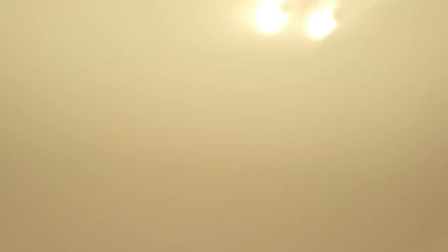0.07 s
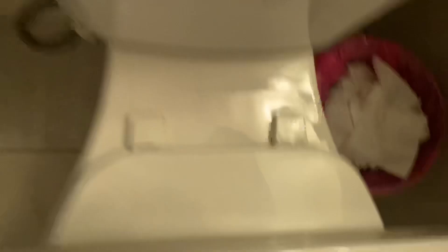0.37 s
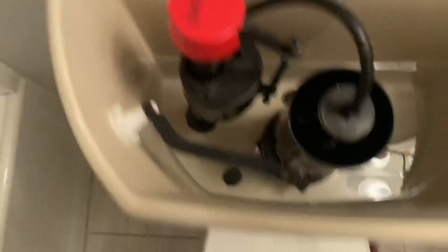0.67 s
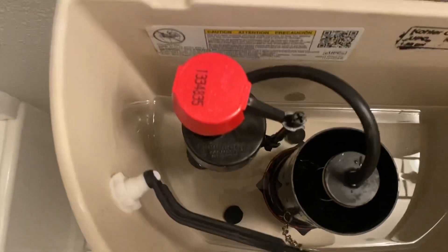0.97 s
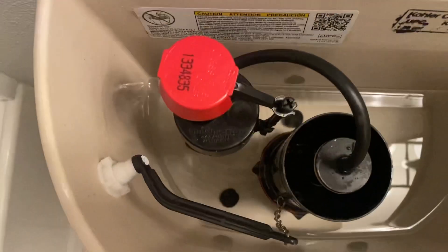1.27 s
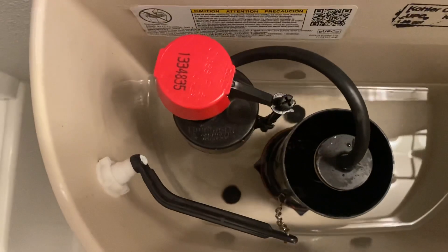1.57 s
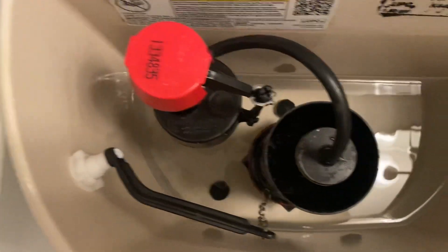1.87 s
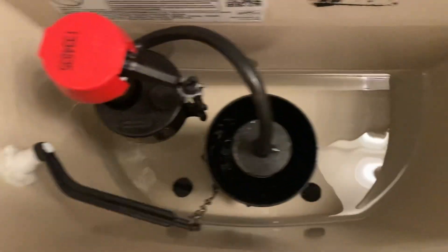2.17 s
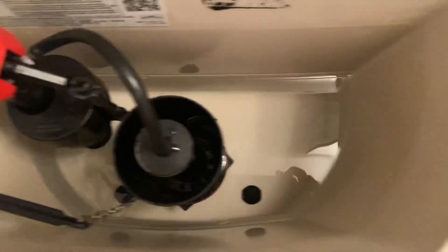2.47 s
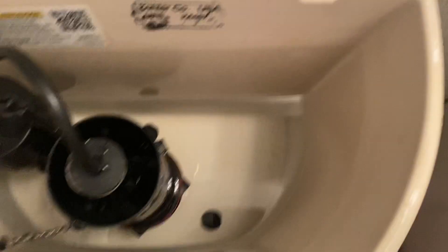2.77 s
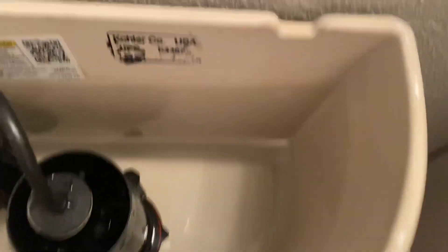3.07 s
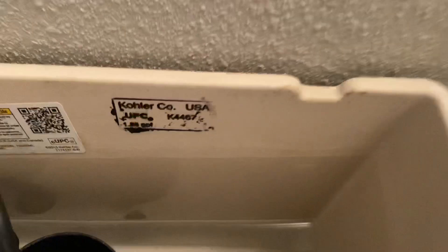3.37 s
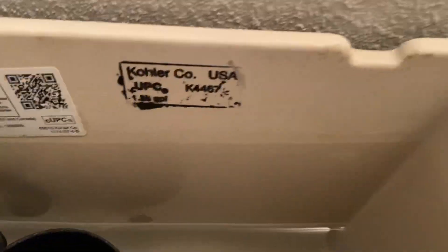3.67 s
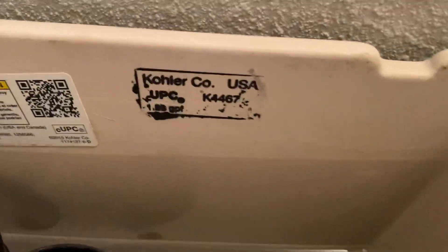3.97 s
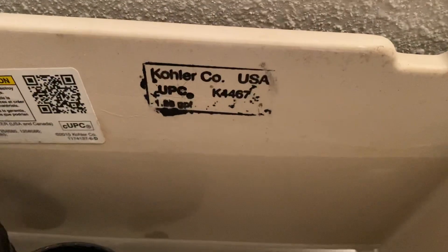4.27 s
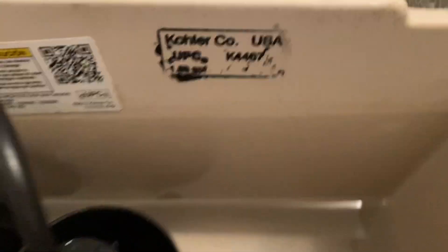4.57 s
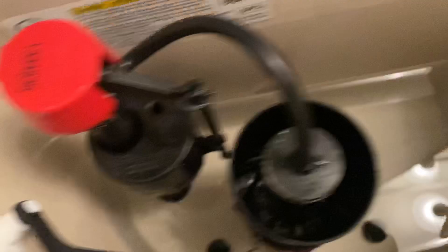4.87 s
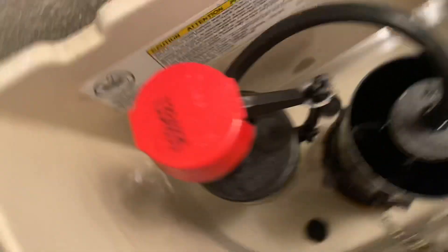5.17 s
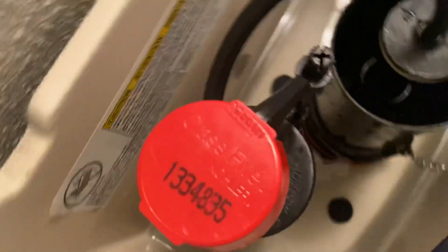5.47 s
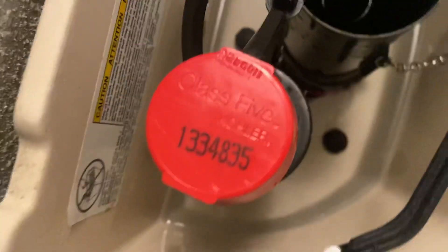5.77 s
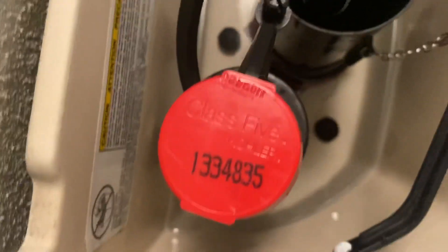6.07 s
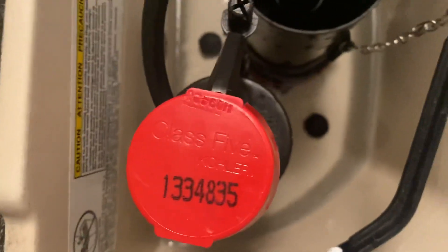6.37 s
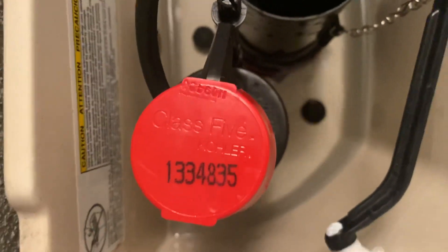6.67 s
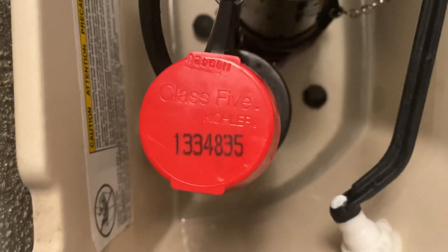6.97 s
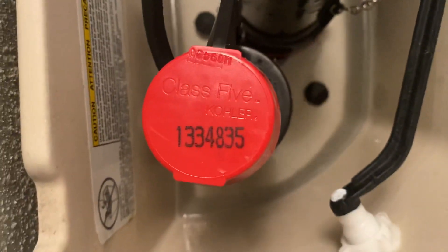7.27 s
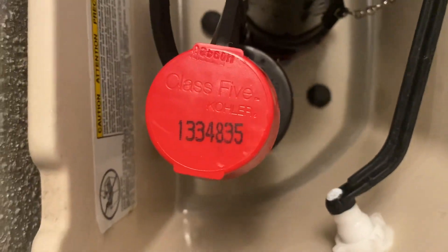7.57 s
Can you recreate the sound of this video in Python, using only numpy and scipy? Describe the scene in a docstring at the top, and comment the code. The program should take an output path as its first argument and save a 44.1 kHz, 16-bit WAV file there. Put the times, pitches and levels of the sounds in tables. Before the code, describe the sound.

Water hisses and rushes steadily through a valve as an open toilet tank refills, with low churning and tiny spits.

```python
"""Open toilet tank refilling

A hand-held camera moves over the tank, is handled twice and leans in towards the fill valve.
The churning inflow booms in the tank's low resonances and the stirred surface rushes.
The valve sings in narrow bands of noise; its jet hisses and spits as tiny bubbles burst.
The camera spreads the treble across the stereo field."""
import sys
import numpy as np
from scipy import signal
from scipy.fft import rfft, irfft, next_fast_len
from scipy.io import wavfile
from scipy.ndimage import uniform_filter1d, map_coordinates

SR = 44100
rng = np.random.default_rng(int(sys.argv[2]) if len(sys.argv) > 2 else 0)


def digitize_waveform(pressure):
    """Quantize a signal to 16-bit integers and store it at the path in sys.argv[1].

    Rows of a 2-D input are taken as channels; values are limited to [-1, 1].
    """
    field = np.atleast_2d(pressure).T
    bounded = np.clip(field, -1, 1)
    quanta = np.round(bounded * 32767).astype(np.int16)
    wavfile.write(sys.argv[1], SR, quanta)


N = 340011
BAND_LIMIT_HZ = 15850


def amp(db):
    """Decibels to gain."""
    return 10 ** (np.asarray(db) / 20)


def unit(x):
    """x at rms 1."""
    return x / np.sqrt(np.mean(x ** 2) + 1e-20)


def along(points, hz):
    """(freq_hz, value) points read on a log axis."""
    freq_hz, values = np.transpose(points)
    return np.interp(np.log(hz + 1), np.log(freq_hz + 1), values)


def spectrum(points):
    """Gain against frequency from (freq_hz, gain_db) points."""
    return lambda hz: amp(along(points, hz))


def resonances(modes, skirt):
    """Gain against frequency of a group of modes; a larger skirt deepens the valleys."""
    return lambda hz: np.sqrt(sum(amp(db) ** 2 / (1 + (2 * (hz - centre) / width) ** 2 / skirt) ** skirt
                                  for centre, width, db in modes))


def curves(rows):
    """One value per sample for each column after the time."""
    time_s, *columns = np.transpose(rows)
    return [np.interp(np.arange(N) / SR, time_s, column) for column in columns]


def wobble(knots_per_s):
    """Smooth random curve."""
    knots = rng.standard_normal(int(N * knots_per_s / SR) + 4)
    return map_coordinates(knots, [np.arange(N) * knots_per_s / SR])


def swells(events):
    """Gain that rises and falls smoothly once per event."""
    t = np.arange(N) / SR
    return sum(amp(db) * np.exp(-(2 * (t - peak_s) / length_s) ** 2) for peak_s, length_s, db in events)


def filtered(x, response):
    """x through a frequency response."""
    size = next_fast_len(N + SR // 2)
    return irfft(rfft(x, size) * response(np.fft.rfftfreq(size, 1 / SR)), size)[..., :N]


def steadied(x, span_s):
    """x with swells slower than span_s evened out."""
    power = uniform_filter1d(np.mean(x ** 2, axis=0), max(int(span_s * SR), 1))
    return x / np.sqrt(np.abs(power) + 1e-6)


def placed(x, lead_rad, pan_db):
    """Stereo x with a moving phase lead and level difference, left over right."""
    left, right = signal.hilbert(x, next_fast_len(N))[:, :N]
    turn = np.exp(0.5j * lead_rad) * amp(pan_db / 2)
    return np.real([left * turn, right / turn])


# Likeness of the two microphones: freq_hz, coherence (capped at 1)
MIC_COHERENCE = [(30, 1.2), (120, 1), (300, 1), (600, 0.6), (1000, 0.5), (1400, 0.65), (1900, 0.7),
                 (2400, 0.66), (4000, 0.8), (5500, 0.5), (6500, 0.5)]
# Their balance: freq_hz, left_over_right_db
MIC_BALANCE = [(120, 0), (350, 2.5), (600, 5.5), (1000, 1.5), (1500, 0), (2400, -1), (2900, 8.5), (3900, 2),
               (5400, 6), (6500, 0)]
# Their phase: freq_hz, left_lead_rad
MIC_PHASE = [(120, 0.028), (350, 0.44), (520, 1), (860, 0.045)]

def turbulence(colour):
    """Coloured noise of rms 1 as the two microphones hear it."""
    size = next_fast_len(N + 8192)
    hz = np.fft.rfftfreq(size, 1 / SR)
    angle = np.arccos(np.clip(along(MIC_COHERENCE, hz), -1, 1)) / 2
    noise = rfft(rng.standard_normal((2, size))) * colour(hz)
    mid, side = noise * np.array([np.cos(angle), np.sin(angle)])
    tilt = amp(along(MIC_BALANCE, hz) / 2) * np.exp(0.5j * along(MIC_PHASE, hz))
    return unit(irfft(np.array([(mid + side) * tilt, (mid - side) / tilt]), size)[:, :N])


def ringing(modes, skirt):
    """Resonances driven by turbulence, at rms 1."""
    return turbulence(resonances(modes, skirt))


def echoes(x, t60_s, wet_db, steps=8):
    """x plus quick reflections whose pattern shifts as the camera moves."""
    t = np.arange(SR // 12) / SR
    hop = N // steps + 1
    wet = np.zeros(N + len(t))
    for centre in range(0, N + hop, hop):
        span = np.arange(max(centre - hop, 0), min(centre + hop, N))
        crossfade = np.sqrt(1 - np.abs(span - centre) / hop)
        tail = rng.standard_normal(len(t)) * amp(-60 * t / t60_s)
        part = signal.oaconvolve(x[span] * crossfade, tail / np.linalg.norm(tail))
        wet[span[0]:span[0] + len(part)] += part
    return x + amp(wet_db) * wet[:N]


def notes(events, rise_per_s):
    """Each event swells as one short note, its pitch rising a little."""
    t = np.arange(N) / SR
    sound = np.zeros(N)
    for (peak_s, length_s, db, hz), phase in zip(events, rng.random(len(events))):
        span = np.abs(t - peak_s) < 2 * length_s
        age = t[span] - peak_s
        envelope = amp(db) * np.exp(-(2 * age / length_s) ** 2)
        sound[span] += envelope * np.sin(2 * np.pi * (phase + hz * age * (1 + rise_per_s * age / 2)))
    return np.sqrt(2) * sound


def bubbles(per_s, pitch_hz, spread, decay_cycles, spread_db):
    """Small bubbles ring briefly, most of them faintly; rms 1."""
    when, pitch, rarity = rng.random((int(per_s * N / SR), 3)).T[:, :, None]
    hz = np.minimum(pitch_hz * np.exp(spread * (2 * pitch - 1)), BAND_LIMIT_HZ)
    size = amp(-spread_db * np.log(np.maximum(rarity, 0.02)))
    age = np.arange(SR // 80)
    cycles = hz * age / SR
    rings = size * np.sin(2 * np.pi * cycles) * np.exp(-cycles / decay_cycles) * (1 - np.exp(-cycles))
    samples = (when * N).astype(int) + age
    return unit(np.bincount(samples.ravel(), rings.ravel(), N)[:N])


def crackle(per_s, spread_db, cap_db, t60_s, rows=1):
    """Envelopes of random pops that add in power: most tiny, a few standing out."""
    hits = rng.random((rows, N)) < per_s / SR
    sizes = hits * amp(np.minimum(spread_db * rng.exponential(size=(rows, N)), cap_db))
    t = np.arange(SR // 20) / SR
    power = signal.oaconvolve(sizes ** 2, amp(-120 * t / t60_s)[None], axes=1)[:, :N]
    return np.sqrt(np.abs(power))


# Camera's lean over the valve: time_s, near_share
CAMERA_LEAN = [(0, 0.15), (0.8, 0.04), (1.6, 0.22), (2.7, 0.23), (3.2, 0.22), (3.9, 0.63), (4.9, 0.64),
               (5.6, 0.88), (7.7, 1)]

def nearness():
    """0 from afar, 1 right over the valve."""
    return np.clip(curves(CAMERA_LEAN)[0], 0, 1)


# Water shaded by the tank's rim: time_s, hidden_share
RIM_SHADE = [(0.25, 0.95), (0.5, 0.07)]

def reach_db(far_db, near_gain_db, rim_loss_db):
    """A layer's level grows as the camera leans in and drops behind the rim."""
    hidden = np.clip(curves(RIM_SHADE)[0], 0, 1)
    return far_db + near_gain_db * nearness() - rim_loss_db * hidden


# Supply pipe's note: centre_hz, width_hz, gain_db
PIPE_MODES = [(830, 160, 0)]
# Room rumble: centre_hz, width_hz, gain_db
ROOM_MODES = [(81, 34, 0)]

def pipe_and_room(pipe_db=-62, room_db=-62):
    """The supply pipe hums faintly over the room's steady rumble."""
    return amp(pipe_db) * ringing(PIPE_MODES, skirt=3) + amp(room_db) * ringing(ROOM_MODES, skirt=3.3)


# Grip shifts: peak_s, length_s, level_db
GRIP_SHIFTS = [(0.13, 0.072, -53), (0.27, 0.15, -42), (0.39, 0.084, -43), (0.52, 0.04, -46),
               (5.01, 0.19, -49), (5.35, .07, -44)]

def handling(centre_hz=55, width_hz=70, low_cut_hz=28):
    """The hand shifts on the camera with a soft rumble."""
    body = resonances([(centre_hz, width_hz, 0)], skirt=2.6)
    rumble = turbulence(lambda hz: body(hz) * (1 - np.exp(-(hz / low_cut_hz) ** 4)))
    return swells(GRIP_SHIFTS) * steadied(rumble, span_s=0.08)


# Tank resonances, three groups: centre_hz, width_hz, gain_db
BOOM_MODES = [(132.4, 21, -2), (152.5, 5.2, -13)]
CHURN_MODES = [(55.7, 13, -14), (88, 34, -8.5), (198, 26, -1.5), (222, 13, -4), (250.8, 22, 4.5),
               (289.5, 52, -1.5), (347, 39, -3.5), (365.2, 7.7, 6.5), (412.7, 24.5, 1), (473, 58, -9.5),
               (770, 19, -10.5), (863, 35, -10)]
HOLLOW_MODES = [(542, 28, 1.5), (579, 24.5, 6), (636, 22, -3.5)]
# Their levels at the camera: time_s, boom_db, churn_db, hollow_db
TANK_LEVELS = [(0, -48.5, -52.5, -60.5), (0.35, -46.5, -56, -60.5), (0.8, -53, -49, -64),
               (1.2, -50.5, -52.5, -64), (1.5, -51, -48, -61.5), (2.5, -49, -49.5, -59),
               (3.85, -48, -42.5, -48.5), (4.2, -41, -43, -48.5), (4.55, -47, -41, -46),
               (5.0, -48, -44.5, -56.5), (5.45, -44, -41.5, -46), (7.7, -42.5, -41, -44.5)]
# Big air bubbles: peak_s, length_s, level_db, pitch_hz
TANK_GLUGS = [(3.09, 0.046, -39, 131), (3.467, 0.042, -41, 132), (3.505, 0.044, -36.5, 130),
              (3.74, 0.034, -35.5, 131), (4.387, .04, -47, 575), (4.555, 0.088, -33, 129),
              (4.97, 0.041, -39.5, 131), (5.15, 0.07, -37, 131), (5.324, 0.045, -39.5, 358),
              (5.449, 0.042, -41, 368), (5.68, 0.051, -35.5, 133), (5.84, 0.053, -35, 133),
              (5.859, 0.043, -39, 580), (6.25, 0.056, -40, 128), (6.469, 0.086, -39, 357),
              (6.626, .035, -42, 570), (6.85, 0.08, -37, 131), (6.864, 0.037, -44, 588),
              (7.11, 0.058, -32, 132), (7.139, .035, -41, 580), (7.187, .035, -42, 572),
              (7.241, 0.037, -40, 132), (7.44, 0.028, -37, 131), (7.655, 0.038, -38.5, 356),
              (7.68, 0.067, -36.5, 132)]

def tank(heave_db=3.0):
    """The inflow churns under water and sounds the tank's low resonances in uneven surges."""
    boom_db, churn_db, hollow_db = curves(TANK_LEVELS)
    churn = amp(churn_db) * steadied(ringing(CHURN_MODES, skirt=3), span_s=0.36)
    boom = amp(boom_db + heave_db * wobble(13)) * steadied(ringing(BOOM_MODES, skirt=4), span_s=0.075)
    hollow = amp(hollow_db) * ringing(HOLLOW_MODES, skirt=2.4)
    return churn + boom + hollow + notes(TANK_GLUGS, rise_per_s=0.43)


# Surface rush from afar and close by: freq_hz, gain_db
RUSH_FAR = [(450, -62), (680, -11), (1050, -10), (1400, -2.5), (1800, 2.5), (2000, -1.5), (2850, -7.5),
            (3100, -14), (3400, 2), (3800, -6.5), (4600, -4), (5000, -10), (5800, -5.5), (7000, -30),
            (10000, -86)]
RUSH_NEAR = [(450, -19), (680, -13), (1000, -11.5), (1200, -6), (1720, 1), (1950, -7), (2850, 0),
             (3100, -13), (3400, -9), (3800, -7.5), (4600, -35), (5000, -11.5), (5800, -10.5), (7000, -38),
             (10000, -63)]
# Its level: far_db, near_gain_db, rim_loss_db
RUSH_REACH = (-49, 9.3, 13)

def surface_rush(froth_db=-6.5):
    """The stirred surface rushes, dotted with small bubbles that echo between the tank walls."""
    near = nearness()
    far_noise = np.sqrt(1 - near) * turbulence(spectrum(RUSH_FAR))
    near_noise = np.sqrt(near) * turbulence(spectrum(RUSH_NEAR))
    rush = (far_noise + near_noise) * amp(1.07 * wobble(22))
    froth = bubbles(per_s=170, pitch_hz=4006, spread=0.341, decay_cycles=9.2, spread_db=1.5)
    froth = unit(echoes(froth, t60_s=0.2, wet_db=3.5))
    return amp(reach_db(*RUSH_REACH)) * (rush + amp(froth_db) * froth)


# Bright spray sheen, passing glint, dull undertone: centre_hz, width_hz, gain_db
SHEEN_MODES = [(4184, 110, 9), (4346, 130, 6.5), (4690, 150, 1.5)]
GLINT_MODES = [(2820, 130, 0), (3430, 130, -5), (3700, 130, 3), (5260, 110, 5), (6230, 120, 12)]
UNDERTONE_MODES = [(1010, 170, 0), (1200, 110, -1)]
# Sheen near 4.3 kHz comes and goes, loudest late, close over the valve: time_s, level_db
SHEEN_LEVEL = [(0.3, -87), (0.52, -52.5), (1.3, -51), (1.6, -66), (1.98, -55), (2.4, -62), (3.8, -52),
               (5.3, -48.5), (5.65, -54), (7.7, -48.5)]
# Glint as the camera swings across the valve: peak_s, length_s, level_db
GLINTS = [(5.05, 0.95, -45)]
# Undertone, fading while the camera faces the back wall: time_s, level_db
UNDERTONE_LEVEL = [(0.3, -69), (0.55, -62.5), (1.9, -59), (2.6, -72), (4.2, -71), (4.9, -54.5), (7.7, -59)]

def passing_resonances():
    """Bright and dull resonances come and go as the camera moves."""
    sheen = amp(curves(SHEEN_LEVEL)[0] + 1.95 * wobble(25)) * ringing(SHEEN_MODES, skirt=2.3)
    glint = swells(GLINTS) * ringing(GLINT_MODES, skirt=2.5)
    undertone = amp(curves(UNDERTONE_LEVEL)[0]) * ringing(UNDERTONE_MODES, skirt=2.5)
    return sheen + glint + undertone


def gliding_band(centre_hz, width_hz, waver_hz=4, flutter_db=0.8):
    """A narrow band of noise flutters and follows a moving, wavering centre."""
    mean_hz = centre_hz.mean()
    band = steadied(ringing([(mean_hz, width_hz, 0)], skirt=1.6), span_s=0.41)
    band *= amp(flutter_db * wobble(18))
    shift_cycles = np.cumsum(centre_hz - mean_hz + waver_hz * wobble(9)) / SR
    return np.real(signal.hilbert(band, next_fast_len(N))[:, :N] * np.exp(2j * np.pi * shift_cycles))


# Valve bands through the tank's standing waves, before trim: time_s, low_db, middle_db, high_db, top_db
BAND_LEVELS = [(0, -48.5, -56, -50, -49.5), (0.28, -54, -55, -65, -55.5), (0.52, -46.5, -47, -44, -39.5),
               (0.85, -46, -48, -43.5, -45), (1.2, -51.5, -49.5, -47, -44.5), (1.7, -47.5, -46.5, -41, -44),
               (2.3, -46.5, -50.5, -41, -38), (2.9, -50.5, -55, -40.5, -42.5), (3.45, -44, -53, -39, -41.5),
               (3.85, -36.5, -50, -35, -41), (4.5, -37.5, -53, -33.5, -37.5), (4.8, -43, -40, -35, -31),
               (5.2, -46, -43.5, -42, -36), (5.55, -45, -43, -43, -47), (6.1, -47.5, -46, -34.5, -39.5),
               (6.7, -43, -52, -36.5, -44.5), (7.2, -47.5, -40.5, -33, -51), (7.7, -40, -51, -38.5, -47)]
# Band centres as the camera moves: time_s, low_hz, middle_hz, high_hz, top_hz
BAND_CENTRES = [(0.4, 1439, 1621, 2316, 2440), (0.85, 1460, 1630, 2314, 2459),
                (1.502, 1459, 1621, 2336, 2468), (2.249, 1457, 1621, 2353, 2513),
                (2.901, 1454, 1594, 2370, 2529), (3.602, 1380, 1613, 2394, 2544),
                (4.452, 1378, 1607, 2391, 2504), (4.801, 1402, 1612, 2386, 2488),
                (5.249, 1410, 1593, 2377, 2488), (5.798, 1352, 1594, 2388, 2510),
                (7.7, 1345, 1597, 2386, 2539)]
# Band widths: low_hz, middle_hz, high_hz, top_hz
BAND_WIDTHS = (52, 33, 48, 95)
# Microphones crossing the waves: time_s, low_lead_rad, middle_lead_rad, upper_lead_rad, upper_pan_db
BAND_BEARINGS = [(0, 2.2, 1.7, 0.63, 2.2), (1.1, -1.8, .05, 1.4, .7), (2, 1, 1.4, 0.78, 5),
                 (2.7, 3.5, 3.95, 0.17, 4), (4.2, 2.5, 3.6, 0.1, 5.3), (5, 1.5, 5.2, 0.28, 4.9),
                 (5.6, -0.1, 7.2, 0.47, 2.2), (7.7, -0.5, 5.7, 0.86, .8)]
# Wash around the middle band, shoulder under the high one: centre_hz, width_hz, gain_db
WASH_MODES = [(1456, 256, 2), (1534, 200, -2), (1716, 100, 1)]
SHOULDER_MODES = [(2212, 80, 0)]
# Their levels, strongest over the valve: time_s, wash_db, shoulder_db
WASH_LEVELS = [(0.2, -55.5, -58), (0.55, -52.5, -46), (1.2, -51, -61), (2.2, -58, -56), (3.2, -49.5, -48),
               (4.3, -44, -45), (5.1, -44.5, -51), (5.7, -38, -45.5), (7.7, -38.5, -40.5)]
# Brief pitched swells in the valve's singing bands: peak_s, length_s, level_db, pitch_hz
BAND_SWELLS = [(0.69, .045, -43, 1610), (0.756, .035, -39.5, 1620), (0.824, 0.034, -39.5, 1623),
               (1.422, .04, -41.5, 1610), (1.464, .04, -45, 1605), (1.709, .04, -42, 1640),
               (2.268, .028, -41, 2509), (2.954, 0.02, -37, 2377), (3.252, 0.019, -34.5, 2354),
               (3.872, .016, -33, 2420), (4.211, 0.013, -28.5, 2380), (4.337, .028, -31, 2400),
               (4.422, 0.053, -37.5, 2424), (4.535, .025, -29, 2345), (4.73, 0.019, -27, 2462),
               (4.776, .022, -30, 2445), (4.828, 0.02, -31.5, 1605), (4.859, 0.007, -25.5, 2400),
               (4.876, .009, -27, 2440), (4.887, 0.0054, -29, 2540), (4.889, 0.023, -34, 1630),
               (4.994, .04, -39, 1604), (5.093, 0.029, -37, 1604), (5.227, 0.054, -37, 1570),
               (5.276, .05, -38, 1604), (5.338, .04, -39, 1630), (5.694, 0.045, -37, 1450),
               (6.037, .034, -32.5, 1530), (6.186, .02, -33.5, 2360), (6.558, 0.017, -33, 2410),
               (6.61, 0.025, -36.5, 1330), (6.679, .016, -37, 1475), (6.794, .016, -33, 2375),
               (6.807, 0.026, -37.5, 1620), (7.018, 0.028, -35, 2390), (7.195, 0.017, -33.5, 1450),
               (7.223, 0.016, -28, 2410), (7.318, 0.047, -35.5, 1644), (7.671, .016, -31, 1500)]

def valve(split_hz=2000):
    """Water forced through the valve sings in four drifting, briefly swelling bands over a wash."""
    low_db, middle_db, high_db, top_db = curves(BAND_LEVELS)
    wash_db, shoulder_db = curves(WASH_LEVELS)
    low_lead, middle_lead, upper_lead, upper_pan_db = curves(BAND_BEARINGS)
    low, middle, high, top = map(gliding_band, curves(BAND_CENTRES), BAND_WIDTHS)
    wash = amp(wash_db + 1.3 * wobble(16)) * ringing(WASH_MODES, skirt=2)
    shoulder = amp(shoulder_db) * ringing(SHOULDER_MODES, skirt=1.6)
    middle_swells = notes([row for row in BAND_SWELLS if row[3] < split_hz], rise_per_s=0.21)
    upper_swells = notes([row for row in BAND_SWELLS if row[3] >= split_hz], rise_per_s=0.2)
    midrange = amp(middle_db + 1) * middle + wash + middle_swells
    upper = amp(high_db - 2) * high + amp(top_db - 3) * top + shoulder + upper_swells
    song = placed(amp(low_db - 2) * low, low_lead, pan_db=0)
    song += placed(midrange, middle_lead, pan_db=0)
    song += placed(upper, upper_lead, upper_pan_db)
    return amp(0.65 * wobble(22)) * song


# Jet's level: far_db, near_gain_db, rim_loss_db
JET_REACH = (-43.5, 10.04, 17.3)

def jet_level_db():
    """Level of the jet's hiss at the camera, per sample."""
    return reach_db(*JET_REACH)


# Droplet resonances: centre_hz, width_hz, gain_db
SPUTTER_MODES = [(3460, 500, -8), (4530, 260, -8), (5380, 150, -4), (6150, 300, 0.5), (7100, 330, 6),
                 (7380, 240, 5.5)]

def sputter(per_s=130, clump_db=4.5, under_jet_db=12):
    """Droplets break off the jet in irregular clumps and tick softly in the lower treble."""
    ticks = crackle(per_s * amp(clump_db * wobble(11)), spread_db=3, cap_db=8, t60_s=0.016)
    return amp(jet_level_db() - under_jet_db) * unit(ticks * ringing(SPUTTER_MODES, skirt=7.5))


def bursts(events, colour, ping_t60_s, puff_t60_s, ping_gain, puff_gain, attack_s, jitter_rad):
    """Each burst gives a brief, unsteady ping and a puff of spray."""
    t = np.arange(SR // 16) / SR
    pings, puffs = np.zeros((2, N + len(t)))
    for start_s, db, hz, spray_db in events:
        start = round(start_s * SR)
        span = slice(start, start + len(t))
        onset = amp(db) * (1 - np.exp(-t / attack_s))
        wander = jitter_rad * np.cumsum(rng.standard_normal(len(t)))
        pings[span] += onset * amp(-60 * t / ping_t60_s) * np.sin(2 * np.pi * hz * t + wander)
        puffs[span] += onset * amp(spray_db - 60 * t / puff_t60_s) * rng.standard_normal(len(t))
    return ping_gain * pings[:N] + puff_gain * filtered(puffs[:N], colour)


def small_spits(count=18, pitch_hz=7200, spread=0.082, boost_db=7, scatter_db=1.2, spray_db=-12):
    """Weaker spits at random times follow the jet's level; rows as in SPITS."""
    starts = rng.integers(N, size=count)
    size, detune = rng.standard_normal((count, 2)).T
    levels_db = jet_level_db()[starts] + boost_db + scatter_db * size
    pitches_hz = pitch_hz * np.exp(spread * detune)
    return [(start_s, db, hz, spray_db) for start_s, db, hz in zip(starts / SR, levels_db, pitches_hz)]


# Jet's loudest spits, drops landing in the water: start_s, level_db, pitch_hz, spray_offset_db
SPITS = [(0.825, -32, 7260, -18), (1.049, -31, 6300, -7), (1.427, -28, 7500, -10), (1.7006, -29, 6600, -14),
         (1.7145, -26, 6840, -12), (2.4029, -30, 6950, -10), (2.735, -26, 6620, -18),
         (3.0569, -28, 6130, -14), (3.3556, -33.5, 7900, 0.5), (3.427, -24, 6790, -12),
         (3.5363, -26.5, 6170, -16), (3.6381, -24, 7480, -25), (3.7947, -26, 7800, -4),
         (3.978, -21.5, 6600, -13), (4.6209, -30, 7240, -2), (4.6335, -21.5, 8560, -9),
         (4.828, -22, 7360, -16), (4.891, -21.5, 7200, -7), (4.93, -25, 6550, -13),
         (5.488, -21.5, 6550, -13), (5.548, -20, 7850, -13), (5.5644, -23, 7740, -4),
         (5.653, -23.5, 6700, -16), (5.9778, -27, 7250, -2), (6.1848, -22, 7760, -10),
         (6.232, -18.5, 7500, -19), (6.317, -24, 7760, -8), (6.333, -22, 7850, -10), (6.35, -22, 7820, -3),
         (6.3879, -21, 7900, -21), (6.418, -26, 7700, -11), (6.432, -24, 7000, -18), (6.547, -26, 7160, -3),
         (6.564, -21.5, 7330, -15), (6.721, -29, 7300, -9), (6.761, -20, 7100, -16),
         (6.8096, -29, 7400, -3), (6.821, -26, 6900, -5), (6.903, -22, 7750, -17), (6.9317, -18, 7800, -9),
         (6.956, -14.5, 7200, -17), (7.3375, -18, 7630, -11), (7.371, -17, 7830, -9),
         (7.431, -12.5, 7420, -11), (7.531, -22.5, 7440, -12), (7.652, -32, 7600, 2)]
DROPS = [(0.814, -30, 5200, -7), (0.9986, -32, 3340, -3), (1.0594, -38, 4120, -1), (1.2396, -39, 3640, 0),
         (1.725, -36, 4740, 5), (1.9275, -34, 4700, 2), (1.9809, -26, 4730, -2), (2.031, -33, 4400, -9),
         (3.8007, -28, 4690, 0), (3.978, -35, 4700, -2), (5.012, -32, 4460, 1), (5.3522, -31, 4320, 0),
         (7.6275, -28, 4300, -7)]
# Snaps of fine spray: start_s, level_db
SNAPS = [(4.369, -24), (4.633, -18), (5.98, -21), (6.186, -22), (6.317, -21.5), (6.335, -26),
         (6.351, -21.5), (6.811, -18), (7.216, -19.5), (7.391, -21), (7.444, -21), (7.485, -19),
         (7.651, -15.5)]
# Spray and fine spray spectra: freq_hz, gain_db
SPRAY = [(2500, -23), (4300, -10), (5600, -13), (6600, -3), (7600, 4), (9000, 1.5), (11000, -1.5),
         (13500, -0.5), (16000, -29)]
FINE_SPRAY = [(4000, -30), (8000, -10), (10500, 1), (12000, -3.5), (14000, -6), (16000, -12)]
# Drop splash resonances: centre_hz, width_hz, gain_db
SPLASH_MODES = [(2800, 110, 7), (3330, 84, 10), (4190, 80, 6), (4700, 100, 11), (5200, 70, 5),
                (6250, 220, 4)]

def splashes(snap_hz=11200):
    """The jet spits and its finest spray snaps; drops splash lower, softer and a little longer."""
    spits = bursts(list(SPITS) + small_spits(), spectrum(SPRAY), ping_t60_s=0.021, puff_t60_s=0.038,
                   ping_gain=0.78, puff_gain=1.4, attack_s=0.00038, jitter_rad=0.18)
    snap_events = [(start_s, db, snap_hz, 0) for start_s, db in SNAPS]
    snaps = bursts(snap_events, spectrum(FINE_SPRAY), ping_t60_s=0.012, puff_t60_s=0.02,
                   ping_gain=0.4, puff_gain=1.5, attack_s=0.0003, jitter_rad=0.3)
    drops = bursts(DROPS, resonances(SPLASH_MODES, skirt=2), ping_t60_s=0.026, puff_t60_s=0.04,
                   ping_gain=0.6, puff_gain=1.7, attack_s=0.0012, jitter_rad=0.09)
    # In direct view, so the walls answer only weakly.
    return echoes(spits + snaps + drops, t60_s=0.035, wet_db=-6)


def bubble_pops(crossover_hz=11500):
    """Bursting bubbles crackle: coarse ones in the lower treble, fine ones at the top; rms 1."""
    def colours(hz):
        fine_share = 1 / (1 + (crossover_hz / (hz + 1)) ** 12)
        return spectrum(SPRAY)(hz) * np.sqrt([1 - fine_share, fine_share])
    puffs = crackle(per_s=240, spread_db=6, cap_db=20, t60_s=0.025, rows=2)
    return unit(filtered(puffs * rng.standard_normal((2, N)), colours).sum(axis=0))


def hiss_band(noise, points):
    """Noise shaped by a spectrum and cut below its first point; rms 1."""
    lowest_hz = points[0][0]
    return unit(filtered(noise, lambda hz: spectrum(points)(hz) * (hz > lowest_hz)))


# Jet hiss from afar and close by: freq_hz, gain_db
HISS_FAR = [(5300, -51), (6200, 11.5), (6700, 11), (7100, 0), (7700, 7), (8500, 6), (9300, 11), (10200, -4),
            (10850, 7.5), (11600, 5.5), (12700, 2), (14000, 3), (15600, 2.5)]
HISS_NEAR = [(5300, -40), (6200, -13), (6700, 2.5), (7100, -9), (7700, 4.5), (8500, 1), (9300, 6),
             (10200, -5), (10850, 1.5), (11600, -6.5), (12700, 6.5), (14000, -15), (15600, -5.5)]
# Jet whistles from afar and close by: centre_hz, width_hz, gain_db
WHISTLES_FAR = [(3340, 130, -1), (6170, 170, 1), (6780, 220, 0), (7370, 160, 0)]
WHISTLES_NEAR = [(3780, 80, 0), (4320, 190, 3), (5420, 75, -1), (6930, 65, 10), (7280, 150, 12),
                 (7790, 110, 10.5), (10772, 130, 11.5)]
# Jet from afar as the camera turns: time_s, whistle_db, hiss_change_db
JET_AFAR = [(0.3, -82, 1), (0.6, -56.5, -1.5), (1.9, -46, -3), (2.6, -59, -2.5), (3.3, -58, -3),
            (3.8, -58, -0.5), (5.2, -54, -3.5), (5.8, -70, -2)]

def jet(pops_db=-3, fizz_db=-3.5, whistle_db=-8):
    """The jet hisses, whistles and crackles with bubbles, louder from close by."""
    near = nearness()
    flutter_db = 0.35 * wobble(7) + 0.8 * wobble(18) + 0.7 * wobble(70)
    far_whistle_db, far_hiss_db = curves(JET_AFAR)
    noise = rng.standard_normal(N)
    far_hiss = (1 - near) * amp(far_hiss_db) * hiss_band(noise, HISS_FAR)
    near_hiss = near * hiss_band(noise, HISS_NEAR)
    pops = amp(pops_db) * bubble_pops()
    hiss = echoes(far_hiss + near_hiss, t60_s=0.027, wet_db=2.5, steps=12)
    fizz = bubbles(per_s=1100, pitch_hz=12310, spread=0.216, decay_cycles=21, spread_db=3.5)
    near_whistle = amp(whistle_db) * near ** 2 * ringing(WHISTLES_NEAR, skirt=2)
    far_whistle = amp(far_whistle_db + 2.4 * wobble(25)) * ringing(WHISTLES_FAR, skirt=3.2)
    spray = unit(hiss + pops + amp(fizz_db) * fizz + near_whistle)
    return amp(jet_level_db() + flutter_db) * spray + far_whistle


def scene():
    """The open tank fills just below the camera."""
    return (tank() + valve() + pipe_and_room() + surface_rush() + passing_resonances()
            + jet() + sputter() + splashes() + handling())


def record(dry, treble_hz=6950, turn_hz=4130):
    """The camera widens the treble by a phase twist and a smear of the side signal, then band-limits."""
    def twist(hz):
        angle = 2 * np.pi * np.maximum(hz - treble_hz, 0) / turn_hz
        angle -= 0.3 * np.sin(angle)
        return np.exp(1j * np.outer([-0.5, 0.5], angle - np.sin(2 * angle) / 2))
    left, right = filtered(dry, twist)
    mid, side = (left + right) / 2, (left - right) / 2
    treble = filtered(side, lambda hz: hz > treble_hz)
    smeared = echoes(treble, t60_s=0.012, wet_db=0, steps=24) / np.sqrt(2)
    side = side - treble + smeared
    return filtered(np.array([mid + side, mid - side]), lambda hz: hz < BAND_LIMIT_HZ)


dry = scene()
out = record(dry)
digitize_waveform(out)
```